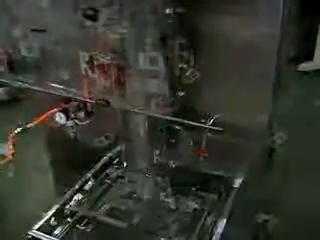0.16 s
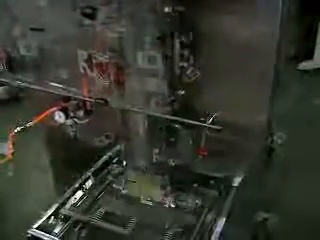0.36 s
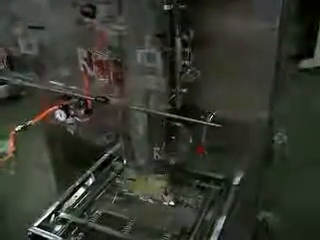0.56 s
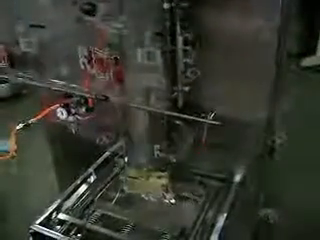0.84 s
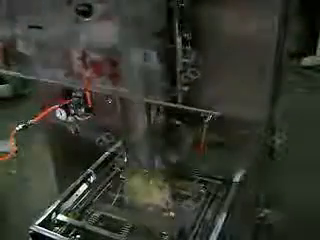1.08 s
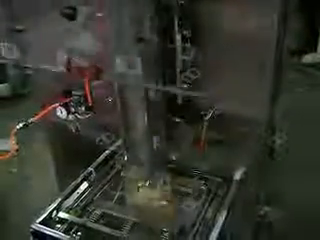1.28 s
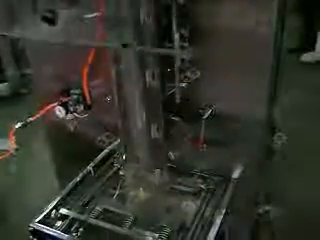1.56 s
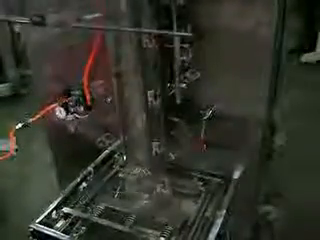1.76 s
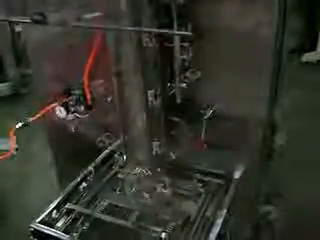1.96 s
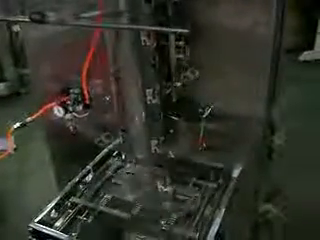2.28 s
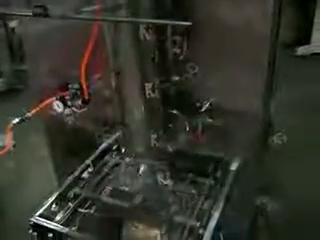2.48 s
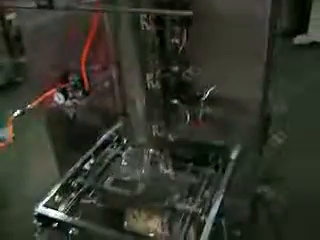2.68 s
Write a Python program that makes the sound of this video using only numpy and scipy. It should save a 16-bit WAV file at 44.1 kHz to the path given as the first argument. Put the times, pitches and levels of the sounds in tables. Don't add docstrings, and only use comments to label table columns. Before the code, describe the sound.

A packaging machine runs close by in an echoing factory hall: a long fading air hiss with rapid clicks, then a rattling metal carriage stroke, a brief motor whine and a short sharp air blast, harshly overloaded.

```python
import sys
import numpy as np
from scipy import signal
from scipy.fft import rfft, irfft, next_fast_len
from scipy.io import wavfile
from scipy.ndimage import uniform_filter1d

SR = 44100
rng = np.random.default_rng(int(sys.argv[2]) if len(sys.argv) > 2 else 0)


def gain_from_db(level_db):
    decades = np.asarray(level_db, float) / 20
    return 10 ** decades


def output_pcm(signal):
    pcm = np.clip(np.atleast_2d(signal).T, -1, 1) * 32767
    wavfile.write(sys.argv[1], SR, np.round(pcm).astype(np.int16))


N = 124803
TIME_S = np.arange(N) / SR
MOTOR_WOBBLE_HZ = 2


def rms_one(x):
    return x / np.sqrt(np.mean(x ** 2) + 1e-20)


def in_time(rows, silent_outside=False):
    s, db = np.transpose(rows)
    ends = dict(left=-90, right=-90) if silent_outside else {}
    return gain_from_db(np.interp(TIME_S, s, db, **ends))


def drift(rate_hz):
    r = np.exp(-80 * np.pi * rate_hz / SR)
    chance = rng.standard_normal(N // 40 + 2002)
    slow = signal.lfilter([1], [1, -2 * r, r * r], chance)[2000:]
    return np.interp(np.arange(N) / 40, np.arange(len(slow)), rms_one(slow - slow.mean()))


def resonate(x, hz, width_hz):
    r = np.exp(-np.pi * width_hz / SR)
    zeros = np.array([1, 0, -1]) * (1 - r * r) / 2
    poles = [1, -2 * r * np.cos(2 * np.pi * hz / SR), r * r]
    return signal.lfilter(zeros, poles, x)


def grains(per_s, spread_db):
    sizes = gain_from_db(spread_db * np.minimum(rng.exponential(1, N), 4)) * rng.choice([-1, 1], N)
    return sizes * (rng.random(N) < per_s / SR) + 1e-18


def banded_noise(spectrum, patchy_db):
    out = 0
    together = drift(14)
    edges = 25 * 2 ** np.arange(0, 8.4, 1 / 3)
    white = rng.standard_normal((2, N))
    table_hz, table_db = np.transpose(spectrum)
    for k, (low, high) in enumerate(zip(edges, edges[1:])):
        band_filter = signal.butter(2, [low, high], "band", fs=SR, output="sos")
        band = signal.sosfilt(band_filter, white[k % 2])
        level_db = np.interp(np.log(low * high) / 2, np.log(table_hz), table_db)
        flicker_db = patchy_db * (0.27 * together + drift(12))
        out = out + band * gain_from_db(level_db + flicker_db)
    return rms_one(out)


def whistle(hz, width_hz):
    noise = rng.standard_normal(N + SR)
    return rms_one(resonate(resonate(noise, hz, width_hz), hz, width_hz)[SR:])


def wavering(hz, waver_db):
    phase = 2 * np.pi * np.cumsum(hz + MOTOR_WOBBLE_HZ * drift(4.33)) / SR
    return gain_from_db(waver_db * drift(6)) * np.sin(phase)


# frequency in Hz, level in dB per Hz.
HALL_ROAR = [(35, -56), (60, -31.5), (90, -14), (265, -9.5), (341, -15), (423, -8.5), (466, -9.5),
             (924, -6), (6390, -24.5), (8310, -72), (14100, -120)]
# time in seconds, level in dB.
DRIVE_LOAD = [(0, 2.5), (.5, 0), (.72, 1), (.8, -1), (1.0, -1), (1.95, -0.5), (2.1, -0.5), (2.5, 1),
              (2.65, -6.5), (2.72, 2), (2.83, -1.5)]


def roar_and_chain():
    chain_hz, width_hz = 907, 390
    links = grains(per_s=600, spread_db=3.0)
    chain = rms_one(resonate(resonate(links, chain_hz, width_hz), chain_hz, 2 * width_hz))
    roar = banded_noise(HALL_ROAR, patchy_db=0.5)
    return in_time(DRIVE_LOAD) * (gain_from_db(-17) * roar + gain_from_db(-20.5) * chain)


# frequency in Hz, width in Hz, level in dB.
MOTOR_TONES = [(99, 3, -41), (175, 5.7, -50), (620, 19, -30), (942, 36, -28.5), (1148.6, 27, -27),
               (1640, 41, -49.5), (1872, 8.9, -51.5)]
# time in seconds, level in dB.
RETURN_MOTOR = [
    (1.85, -40),
    (1.95, -26.5),
    (2.27, -24),
    (2.33, -50),
]


def motors():
    whine_hz, return_hz = 942, 423
    hum = sum(gain_from_db(db) * whistle(hz, width_hz) for hz, width_hz, db in MOTOR_TONES)
    phase = 2 * np.pi * np.cumsum(whine_hz + MOTOR_WOBBLE_HZ * drift(3.74)) / SR
    whine = gain_from_db(-24.5 + 2.5 * drift(2.3)) * np.sin(phase)
    returning = in_time(RETURN_MOTOR, True) * np.sin(phase * return_hz / whine_hz)
    return hum + whine + returning


# time in seconds, pressure in dB.
LONG_EXHAUST = [(0, -13.5), (.05, -10.5), (.13, -10.5), (.31, -17), (.38, -12), (.44, -19), (.49, -13.5),
                (.72, -21.5), (.76, -49.5)]
# time in seconds, pressure in dB.
SHORT_EXHAUST = [(2.30, -57.5), (2.315, -13.5), (2.36, -9), (2.42, -9), (2.46, -9), (2.522, -8),
                 (2.54, -21), (2.59, -28.5), (2.64, -39.5)]
# frequency in Hz, level in dB per Hz.
LONG_JET = [(120, -34.5), (200, -17.5), (585, -25), (656, -13.5), (1110, -29.5), (1170, -13.5),
            (2560, -7.5), (4990, -15.5), (6390, -10.5), (8310, -65), (14100, -120)]
# frequency in Hz, level in dB per Hz.
SHORT_JET = [(120, -44.5), (200, -4), (828, -6.5), (943, 4), (1190, 0), (1660, -3), (2350, 1.5),
             (5220, -2.5), (6390, -4.5), (8310, -60.5), (14100, -120)]
# frequency in Hz, width in Hz, level in dB over the jet.
JET_WHISTLES = [(2330, 500, -12), (3640, 100, -20), (3960, 150, -18)]


def exhausts():
    long_jet = banded_noise(LONG_JET, patchy_db=1)
    short_jet = banded_noise(SHORT_JET, patchy_db=1)
    short_jet += sum(gain_from_db(db) * whistle(hz, width_hz) for hz, width_hz, db in JET_WHISTLES)
    return in_time(LONG_EXHAUST, True) * long_jet + in_time(SHORT_EXHAUST, True) * short_jet


# start in seconds, burst level in dB,
# brightness in Hz, decay by 60 dB in seconds, crack level in dB.
VALVE_AND_JAW_KNOCKS = [(.045, -17, 2500, .08, -3), (.088, -18, 2500, .06, -3), (.128, -16, 2500, .08, -2),
                        (.167, -18, 2000, .06, -3), (.246, -22, 2500, .04, 0), (.371, -16, 2500, .08, 0),
                        (.496, -17, 2000, .05, 2.5), (.569, -14, 2500, .05, 2.5),
                        (.445, -20, 4500, .3, -20), (.945, -20, 900, .08, -15), (1.014, -13, 2400, .15, -2),
                        (1.192, -9, 2800, .1, 1.5), (1.475, -18, 3000, .05, -6),
                        (1.545, -18, 3000, .05, -6), (1.705, -18, 2500, .06, -6),
                        (1.789, -15, 3000, .1, -6), (2.313, -17, 3000, .06, -3),
                        (2.337, -16, 3500, .06, 1.5), (2.685, -15, 2200, .13, -10),
                        (2.78, -21, 2000, .04, -10)]


def knocks():
    out = np.zeros(N + SR)
    t = np.arange(SR // 4) / SR
    noises = rng.standard_normal((len(VALVE_AND_JAW_KNOCKS), len(t)))
    for (start_s, db, hz, t60_s, crack_db), noise in zip(VALVE_AND_JAW_KNOCKS, noises):
        crack = gain_from_db(crack_db - 60 * t * hz / 9) * np.sin(np.pi * hz * t)
        burst = rms_one(resonate(noise, hz, hz / 0.8)) * gain_from_db(db - 60 * t / t60_s)
        start = int(start_s * SR)
        out[start:start + len(t)] += crack + burst
    return out[:N]


# time in seconds, level in dB.
FEED_MOTOR = [(1.008, -43.5), (1.016, -17.5), (1.12, -21.5), (1.3, -24), (1.6, -22.5), (1.8, -25),
              (1.9, -34)]
# frequency in Hz, waver in dB, level in dB.
FEED_MOTOR_LINES = [(327, 3.0, -3), (356, 3.0, -7), (413, 1.5, 4), (970, 3.0, -4)]


def feed_motor():
    lines = sum(gain_from_db(db) * wavering(hz, waver_db) for hz, waver_db, db in FEED_MOTOR_LINES)
    return in_time(FEED_MOTOR, True) * lines


# time in seconds, level in dB.
STROKE_FORCE = [(1.009, -23), (1.013, -9), (1.06, -11), (1.1, -11), (1.17, -11.5), (1.22, -12.5),
                (1.4, -13), (1.8, -11.5), (1.93, -29)]
# time in seconds, extra force in dB.
GUIDE_SURGES = [(1.017, 2.5), (1.049, 4.5), (1.152, 3.5), (1.268, 3.5), (1.32, 2.5), (1.394, 6.5),
                (1.445, 2), (1.495, 3.5), (1.55, 3), (1.605, 1), (1.661, 3), (1.71, 2.5), (1.75, 0),
                (1.79, -0.5)]
# frequency in Hz, level in dB, decay by 60 dB in seconds.
FRAME_MODES = [(313.5, -2.5, 0.3), (365, -6, .2), (509, -9, 0.21), (527, 4.5, 0.052), (552, -24, .2),
               (598.3, 2.5, 0.18), (626, -0.5, 0.2), (712, -22.5, 0.26), (840, -16, 0.041), (905, 1, 0.06),
               (1021, -1.5, 0.05), (1095, 0, 0.44), (1297.6, 0.5, 0.22), (1401, 2.5, 0.066)]
# frequency in Hz, level in dB per Hz.
SLIDING = [(120, -60), (200, -16.5), (444, -17.5), (611, -5.5), (748, -8.5), (1420, -17), (1610, -15.5),
           (3530, -17.5), (6390, -29.5), (8310, -62), (14100, -120)]


def carriage_stroke():
    surge_s, throb_db = 0.013, 1
    force = in_time(STROKE_FORCE, True) * gain_from_db(throb_db * drift(22))
    force *= gain_from_db(sum(db * np.exp(-((TIME_S - s) / surge_s) ** 2) for s, db in GUIDE_SURGES))
    contacts = rms_one(grains(per_s=600, spread_db=3.5))
    ringing = 0
    for hz, db, t60_s in FRAME_MODES:
        width_hz = np.log(1000) / (np.pi * t60_s)
        blows = force * contacts * rng.standard_normal(N)
        ringing = ringing + gain_from_db(db) / np.sqrt(width_hz) * resonate(blows, hz, width_hz)
    ringing *= np.sqrt(np.mean(force ** 2)) / np.sqrt(np.mean(ringing ** 2))
    sliding = force * banded_noise(SLIDING, patchy_db=1)
    return gain_from_db(-2) * ringing + gain_from_db(-1) * sliding


def hall_echo(x):
    t60_s = 0.52
    size = next_fast_len(N + SR)
    w = 2 * np.pi * np.arange(size // 2 + 1) / size
    tail = 0
    for k, lag in enumerate((rng.uniform(.025, .06, 10) * SR).astype(int)):
        loop = gain_from_db(-60 * lag / SR / t60_s) * np.exp(-1j * w * lag)
        tail = tail + (-1) ** k * loop / (1 - loop)
    return irfft(rfft(x, size) * tail, size)[:N]


def scene():
    near = exhausts() + knocks() + feed_motor() + carriage_stroke()
    return (roar_and_chain() + motors() + near + gain_from_db(-17) * hall_echo(near))[None]


def top_cut(x):
    return signal.sosfilt(signal.butter(12, 15800, fs=SR, output="sos"), x)


def record(dry):
    power = np.maximum(uniform_filter1d(dry ** 2, size=1500), 1e-9)
    buffeting = power ** (1.7 / 2)
    low_pass = signal.butter(2, 70, fs=SR, output="sos")
    rumble = rms_one(signal.sosfilt(low_pass, rng.standard_normal(dry.shape)))
    lopsided = dry + 0.03 * (dry ** 2 - np.mean(dry ** 2))
    band_limit = signal.cheby2(8, 70, 8350, fs=SR, output="sos")
    narrow = signal.sosfilt(band_limit, lopsided + gain_from_db(-20) * buffeting * rumble)
    return top_cut(np.clip(narrow, -1.0, 1.0))


dry = scene()
out = record(dry)
output_pcm(out)
```